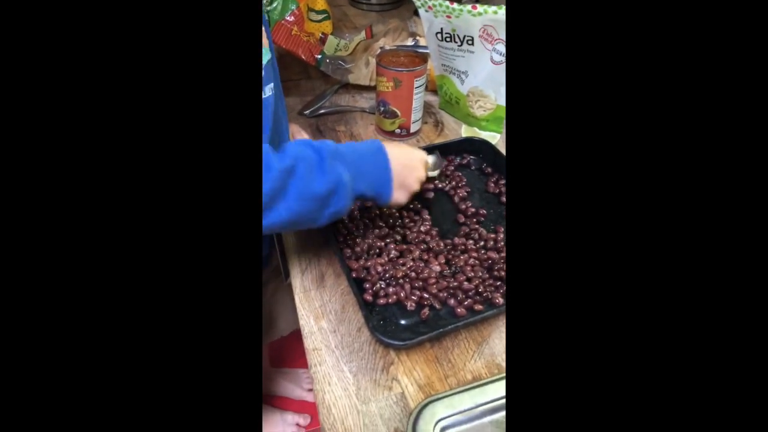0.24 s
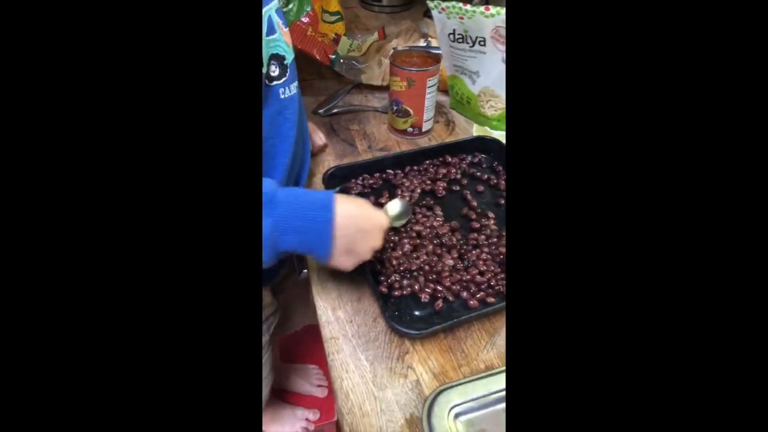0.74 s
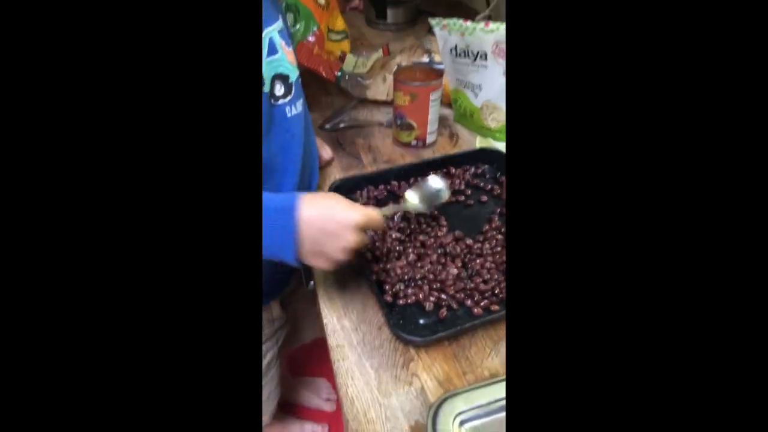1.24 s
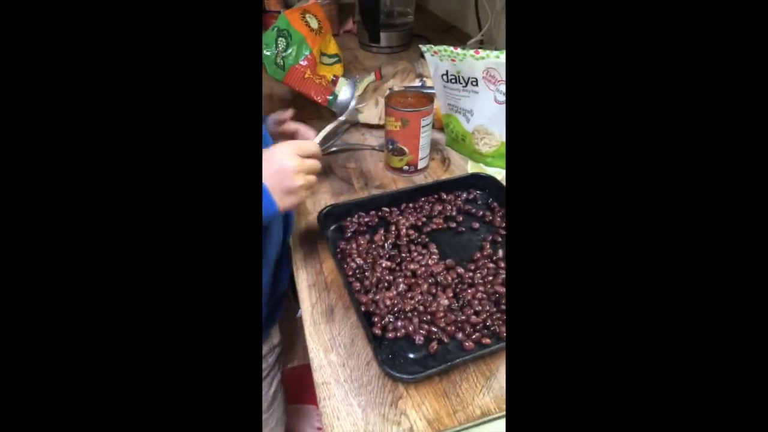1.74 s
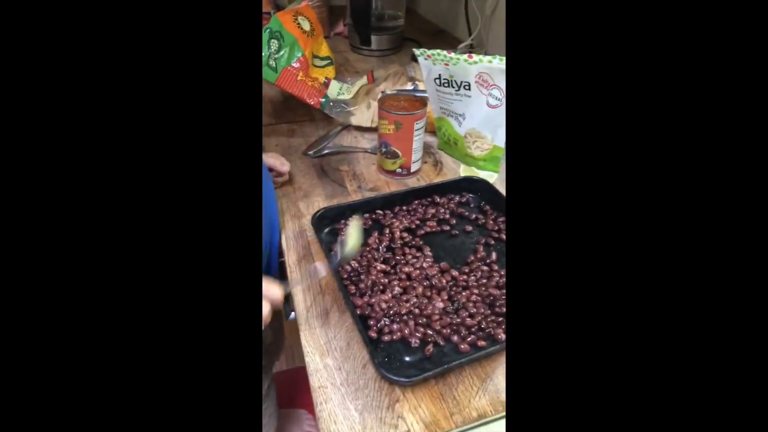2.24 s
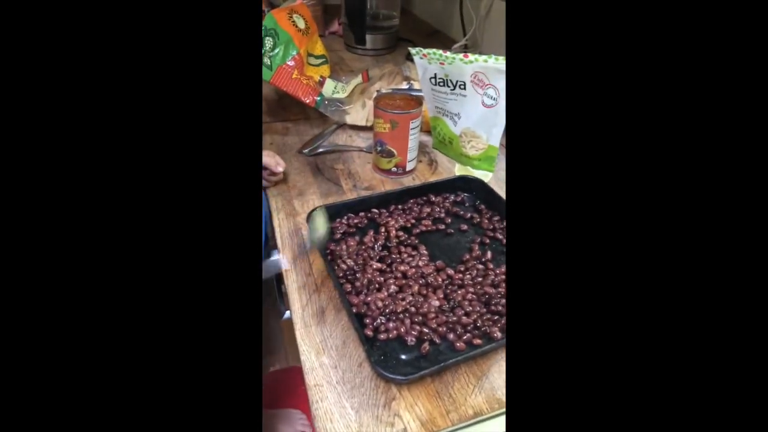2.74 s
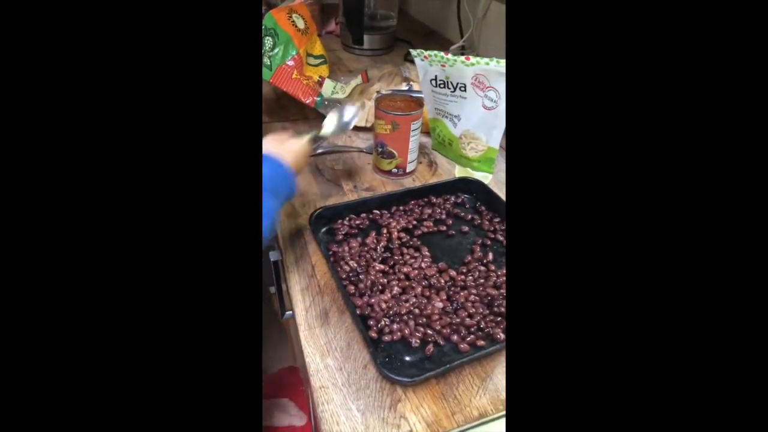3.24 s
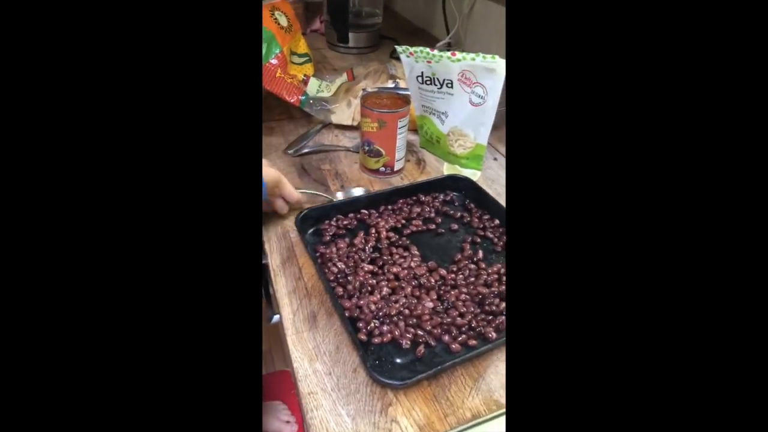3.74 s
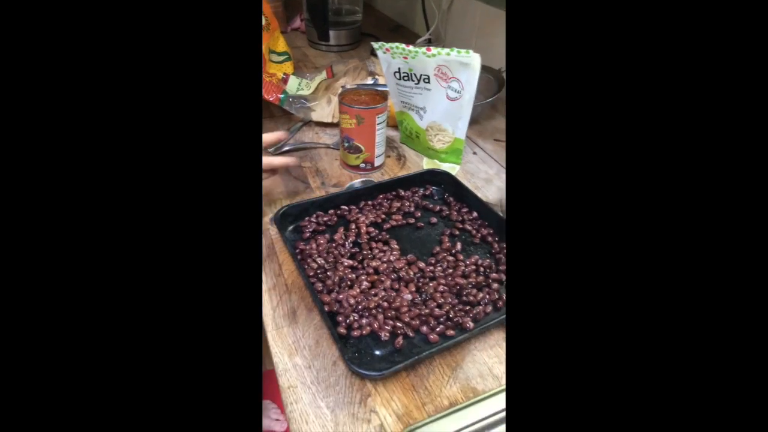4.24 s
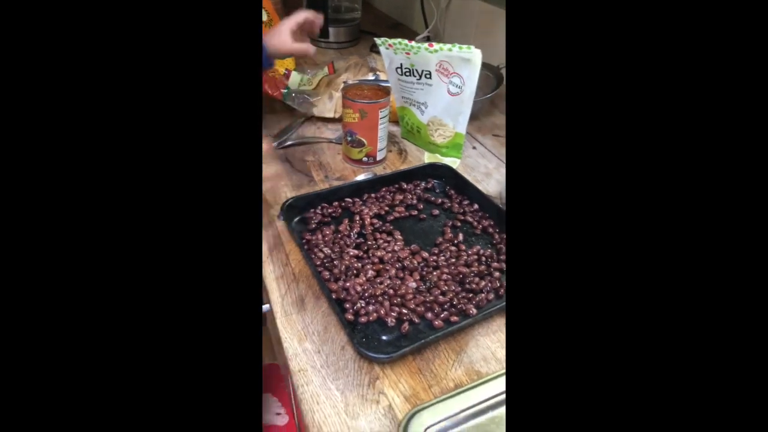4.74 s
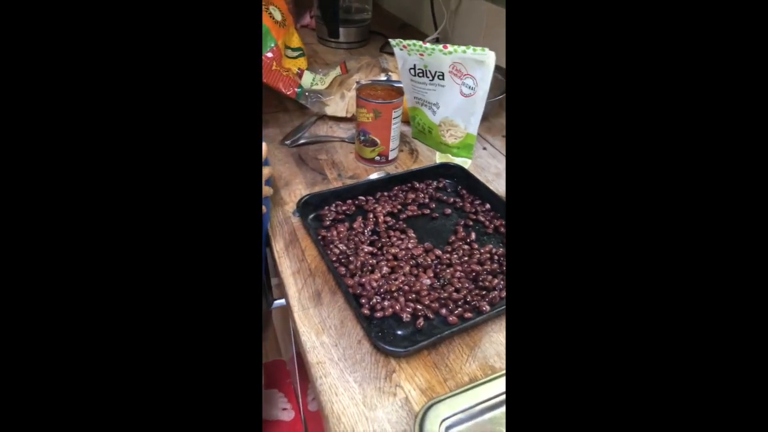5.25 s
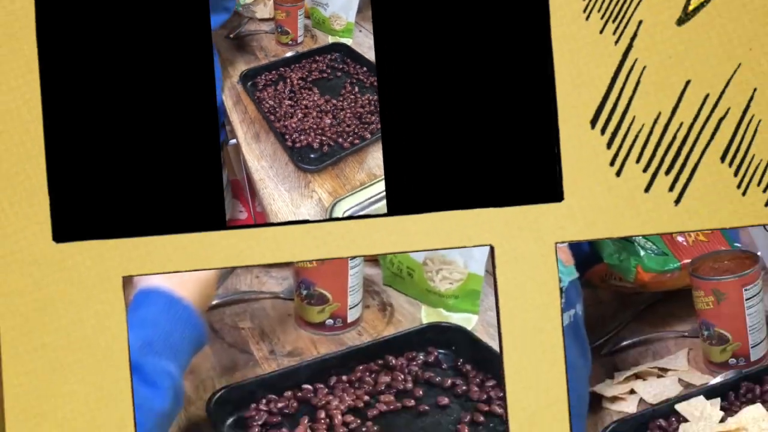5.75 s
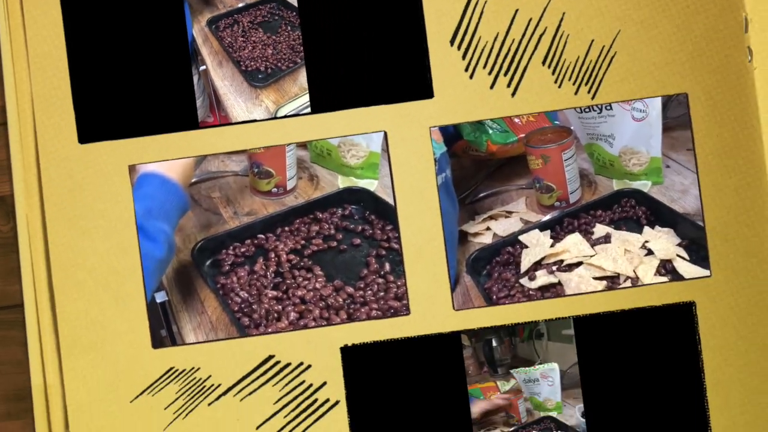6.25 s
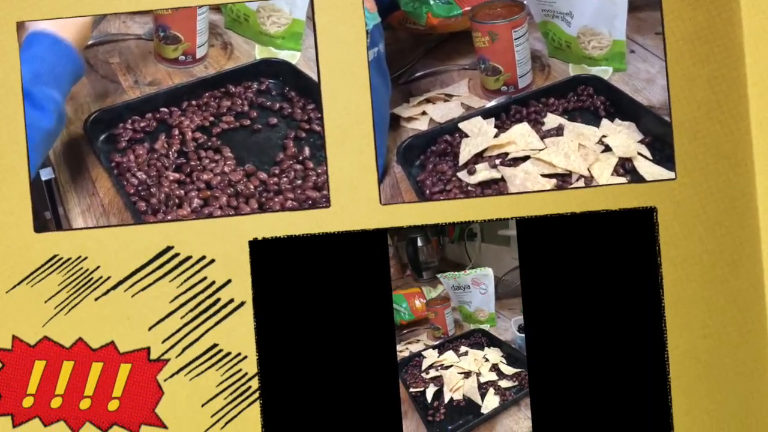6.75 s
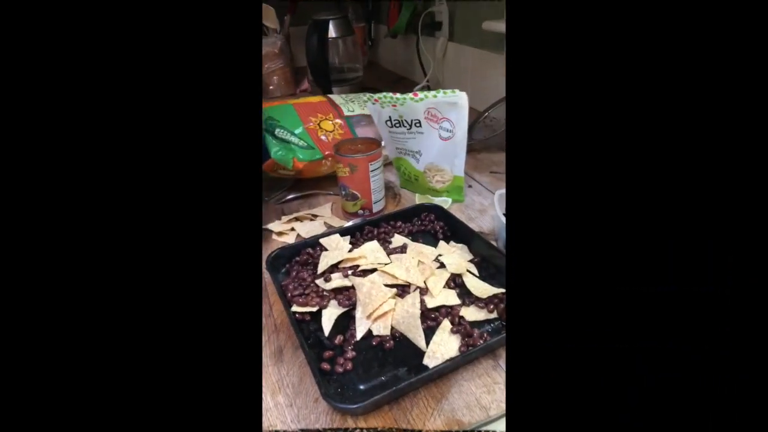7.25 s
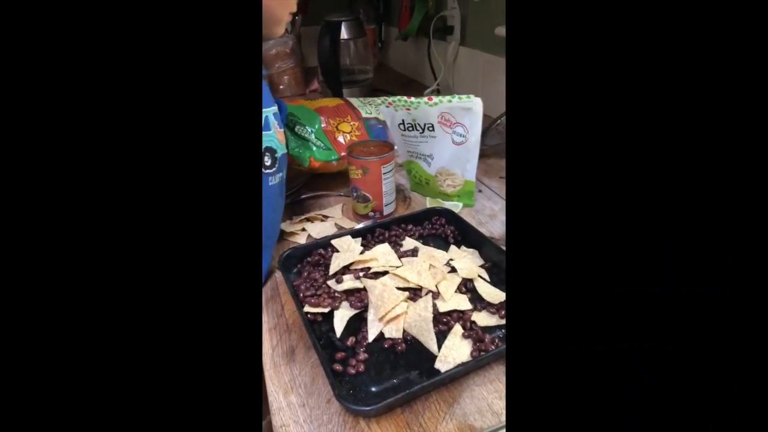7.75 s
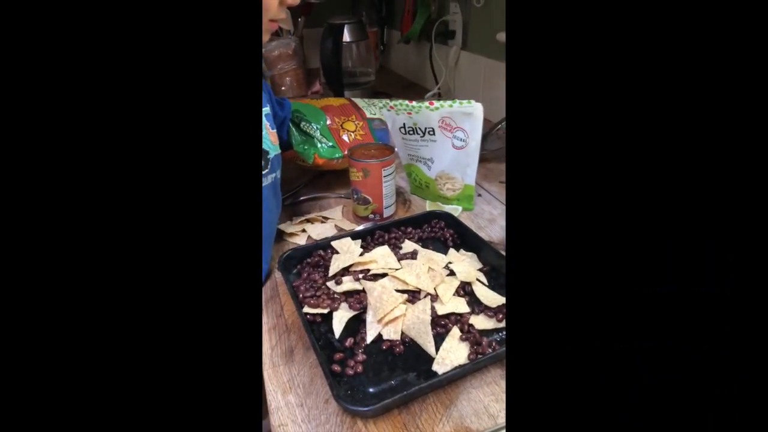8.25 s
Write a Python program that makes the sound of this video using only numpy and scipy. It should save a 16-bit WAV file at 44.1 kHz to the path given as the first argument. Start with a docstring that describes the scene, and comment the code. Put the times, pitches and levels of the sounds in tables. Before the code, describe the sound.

For the first two seconds a steel spoon pushes beans over a metal baking tray, making a faint rustle with soft, dull bumps. At about 2.5 and 2.7 seconds the spoon knocks sharply on the tray's rim, the loudest hits. A light brush and soft bumps follow, then another tap at 3.7 seconds. Between 4.3 and 4.6 seconds the spoon drops onto a wooden counter and bounces, with a brief, high steel ring. After a short lull, a hand starts crumpling a plastic chip bag at about 5.5 seconds. The crinkling is light at first, dotted with bright snaps, then grows denser and louder from 7 seconds and continues to the end, at around 8.7 seconds. Everything sounds close, with a short kitchen echo, over a faint, steady low hum and hiss.

```python
"""First comes a faint rustle with soft bumps: a steel spoon pushes beans over a baking tray.
The spoon knocks on the tray's rim, then drops and bounces on the counter, its steel ringing.
After that a hand crumples a plastic chip bag, whose creases give way in crackles and sharp snaps.
The kitchen echoes every blow, over a low steady hum and hiss."""
import sys
import numpy as np
from scipy import signal
from scipy.fft import rfft, irfft, next_fast_len
from scipy.io import wavfile
from scipy.ndimage import uniform_filter1d, map_coordinates

SR = 44100
rng = np.random.default_rng(int(sys.argv[2]) if len(sys.argv) > 2 else 0)


def master(y):
    """Save y as 16-bit WAV."""
    cut = np.clip(np.atleast_2d(y).T, -1, 1)
    pcm = np.round(cut * 32767)  # scale
    wavfile.write(sys.argv[1], SR, pcm.astype(np.int16))


N = 375291

# A hit has a low thud, a middle click and a high crack; t60 is the time to fade by 60 dB.
# In a row, the dB columns after "level" are added to that level.
# Spoon blows: t/s, level/dB, thud/dB, crack/dB, base rattle t60/s, contact/ms,
# counter/dB, rim/dB, spoon bowl/dB, spoon handle/dB
SPOON_BLOWS = [(2.52, -9.5, -10.5, 0.5, 0.033, 0.0012, -29.5, -8.5, -83, -80),
               (2.7282, -8.5, -18, 2, 0.055, 0.0034, -26.5, -8.5, -36, -82),
               (3.6687, -12.5, -14, -22, 0.031, 0.08, -25.5, -20.5, -42.5, -29),
               (4.275, -15.5, -8, -16, 0.076, 0.076, -21.5, -77.5, -12, -38),
               (4.370, -15, -19.5, -3.5, 0.032, 0.0093, -23.5, -14.5, -61, -23),
               (4.5043, -20.5, -17.5, 2, 0.021, 0.044, -30, -19.5, -59, -68),
               (4.5599, -28.5, -17, -6, 0.016, 0.03, -27.5, -22, -51, -52)]
# Tones of the free spoon: f/Hz, hit on the bowl/dB, hit on the handle/dB, t60/s
SPOON_TONES = [(3290, -9, -20.5, 0.54), (3590, -31.5, -3, 0.29), (4830, -4, -3, .5), (5485, -16, -26, .45),
               (7120, -7, -30.5, 0.6), (7800, -42, 1, 0.35), (9200, -4, -19, 0.16), (12650, -28, -23, .3),
               (13570, -33.5, -22.5, .2), (13880, -34.5, -33.5, .4), (15500, -36, -26.5, .25)]
# Tones of the tray's rim: f/Hz, gain/dB, t60/s
RIM_TONES = [(1470, -7.5, 0.05), (2022, -6.5, 0.22), (2450, 8, 0.0094), (2863, 0, .035), (4830, -3.5, .03),
             (6600, 6, 0.016), (7940, 0, 0.039), (9100, -1, 0.025), (10100, 7, 0.01), (11170, -4, 0.04),
             (15200, -5.5, .01)]
# Tones of the wooden counter: f/Hz, gain/dB, t60/s
COUNTER_TONES = [(126, -5.5, 0.097), (175, -2.5, .1), (300, -4.5, 0.1), (490, 0, 0.056), (710, 2.5, 0.05),
                 (990, 5.5, .04)]
# How hard the hand crumples the bag: t/s, level/dB, low crackle/dB
SQUEEZES = [(5.43, -66, -3), (5.47, -54, -4), (5.54, -62, 2), (5.72, -54.5, -4.5), (5.79, -46, 1),
            (5.9, -49.5, -2.5), (6.1, -50, -3.5), (6.3, -52, -7), (6.55, -52, -5.5), (6.621, -44, -1.5),
            (6.7, -52, -1), (6.81, -45, 1), (6.86, -43, 1), (7.0, -37.5, -1), (7.055, -49, 5),
            (7.1, -39, -2), (7.26, -41.5, 3), (7.45, -40, -3), (7.55, -45.5, 0), (7.609, -40, 0.5),
            (7.86, -40, 0), (7.95, -49.5, -0.5), (8.07, -44, 7), (8.15, -46, 2.5), (8.261, -38, -4),
            (8.33, -44, -3.5), (8.41, -38, -3), (8.51, -46, 2.5)]
# The bag's loudest snaps: t/s, level/dB, thud/dB, crack/dB
BAG_SNAPS = [(5.586, -45, -5, 0), (5.640, -46, -11, 7.5), (5.75, -24, -15.5, 5), (5.863, -25, -19, 0),
             (5.905, -32, -16, -6), (5.944, -28, -17, 10), (6.044, -31, -11, -8), (6.104, -44, -7, -12),
             (6.135, -21.5, -16, 4.5), (6.18, -32.5, -17, -7), (6.221, -26, -27, 1.5),
             (6.258, -32, -14, -8), (6.282, -31.5, -24, 2), (6.336, -29, -9.5, 4), (6.379, -38, -27, 11),
             (6.464, -33.5, -36, 13), (6.599, -32, -13.5, 6), (6.719, -43, -26, 6),
             (6.785, -29.5, -20, -13), (6.833, -24, -15, 3.5), (6.882, -23, -24, -2),
             (6.93, -24.5, -17, -4), (6.987, -17.5, -12.5, 4.5), (7.077, -13.5, -8, -2),
             (7.125, -25, -9, 16.5), (7.144, -20.5, -3, -16), (7.200, -18, -9.5, -2), (7.220, -25, -12, 3),
             (7.292, -23, 0, 6.5), (7.339, -26, -9, -15), (7.363, -24, -13, -1), (7.391, -33, -14, -10),
             (7.420, -19, -4.5, 3.5), (7.474, -28.5, -19, -12), (7.509, -22.5, -18, 3),
             (7.567, -27.5, -5, 11), (7.595, -24, 2.5, -3), (7.669, -35, -4, -6), (7.711, -13, -17, 0.5),
             (7.759, -16, -11, 1.5), (7.835, -28, -3, 4), (8.073, -35, 4, -12), (8.178, -34, 2, -7),
             (8.194, -30, 2, 2), (8.227, -30, -15, -6), (8.246, -31, -3, 10), (8.275, -27, 0, 2),
             (8.362, -31, -14, 4), (8.396, -32, -20, 6), (8.412, -26, -10, -6)]
# Tone colour of the snaps: f/Hz, gain/dB
SNAP_SPECTRUM = [(3000, -1.5), (7000, 3.5), (10000, 3.5), (15000, -7)]
# Tone colour of the crackle: f/Hz, gain/dB
CRACKLE_SPECTRUM = [(24, -47), (40, -29), (134, -8.5), (386, -6.5), (485, 2), (639, -4.5), (690, 4),
                    (744, -1.5), (1090, 2), (2090, 2), (8360, -5), (14900, -20), (16500, -25)]
# Bumps of spoon, beans and hands: t/s, level/dB, thud/dB, knock f/Hz, knock/dB
SOFT_BUMPS = [(0.0718, -49, -10, 1400, 15), (0.1341, -64, 15, 720, 13.5), (0.3076, -46.5, -22, 1420, 18.5),
              (0.3474, -52, -20, 333, 3), (0.429, -50.5, 3, 1320, 18), (0.4903, -57, 9, 1020, 4),
              (0.5114, -64, 13.5, 716, 10.5), (0.5442, -62.5, 5.5, 544, 13), (0.7932, -58.5, 7, 670, 8),
              (0.9118, -63, 3, 205, -4), (1.0933, -61.5, 11.5, 610, -2), (1.8063, -48.5, 1, 320, -1),
              (2.1676, -63.5, 3.5, 200, 11), (2.387, -60, -9, 258, -4), (3.158, -61, 8, 301, 1),
              (3.2828, -50.5, 1, 327, 3), (4.118, -63, 2.5, 654, 0.5), (4.8649, -59.5, 10, 146, -6.5),
              (5.79, -61.5, 4, 113, 12.5)]
# Brushes of beans and sleeve: loudest from t/s, hold/s, hiss/dB, dull rub/dB
BRUSH_STROKES = [(0.0, 0.048, -65, -59.5), (0.314, 0.029, -80.5, -61), (0.463, 0.039, -75, -63),
                 (1.077, .01, -78, -72), (1.62, 0.015, -77.5, -84), (1.84, .01, -80.5, -76),
                 (2.184, 0.011, -80, -80.5), (3.18, 0.093, -73, -72), (4.868, 0.011, -94, -93)]
# Tone colour of their hiss: f/Hz, gain/dB
BRUSH_SPECTRUM = [(590, -27), (1000, -8), (1720, -2.5), (3270, -6), (14800, -14.5), (15900, -38.5),
                  (16500, -53.5)]
# How long the room echoes: f/Hz, t60/s
ECHO_TIMES = [(100, .25), (500, 0.56), (1500, .42), (4000, 0.4), (9000, 0.34), (16000, 0.19)]
# Tone colour of the background: f/Hz, gain/dB
HUM_SPECTRUM = [(12, -31), (20, -11), (86, 5), (169, -8.5), (244, -3.5), (372, -8), (492, -14),
                (634, -18.5), (690, -18.5), (994, -20.5), (1470, -33.5), (2580, -34), (3520, -32.5),
                (12100, -40.5), (16500, -54.5)]


def spoon(bounce_s=0.15, held_share=0.7):
    """Each blow clicks and sets counter, rim and spoon ringing; the next blow stops the spoon's ring."""
    out, t = np.zeros(N + SR), np.arange(SR // 2) / SR
    rows = np.array(SPOON_BLOWS)
    hz, on_bowl, on_handle, t60 = np.transpose(SPOON_TONES)
    gaps = np.append(np.diff(rows[:, 0]), 1)
    for (s, db, *_, counter_db, rim_db, bowl_db, handle_db), gap in zip(rows, gaps):
        chatter = 0.6 + 0.9 * np.tanh(wobble(900, len(t)))  # the loose rim buzzes
        struck = amp(counter_db) * ring(COUNTER_TONES, t) + amp(rim_db) * ring(RIM_TONES, t) * chatter
        struck *= fade_in(t, 0.00066)
        tone_db = 20 * np.log10(amp(bowl_db + on_bowl) + amp(handle_db + on_handle))
        share = 1 if gap < bounce_s else held_share  # a held or lying spoon rings less long
        steel = ring(zip(hz, tone_db, t60 * share), t)
        steel *= amp(1.5 * wobble(35, len(t)))  # the spoon rocks
        steel *= fade_in(t, 0.0024) * amp(-60 * np.clip(t - gap, 0, None) / 0.02)
        out[round(s * SR):][:len(t)] += amp(db) * (struck + steel)
    return out[:N] + sum(bursts(rows, rows[:, 4:5], strike=1.3, contact_ms=rows[:, 5:6]))


def bag_snaps():
    """The plastic lets go in single loud, bright snaps."""
    return coloured(sum(bursts(BAG_SNAPS, t60=0.021, strike=3.3)), SNAP_SPECTRUM)


def bag_crackle(count=2200, swell_db=6, settle_s=0.087, memory_s=0.34):
    """Creases give way at random, few large and many small; the hand sets how loud they are."""
    t = np.arange(N) / SR
    times, levels, lows = np.transpose(SQUEEZES)
    start, end = times[0], times[-1]
    held = slice(round(start * SR), N)
    when, size, thud, crack, life = rng.random((count, 5)).T
    size_db = -3.5 * np.log(size + 0.062)
    creases = np.transpose([start + when * (end - start), size_db, 12 * thud, 12 * crack])
    crackle = bursts(creases, t60=0.0033 + 0.024 * life[:, None], strike=2.98, size=768)
    # A snap sets off small creases: the crackle swells, then settles.
    snap_times = np.append(0, np.array(BAG_SNAPS)[:, 0])
    since_snap = t - snap_times[np.searchsorted(snap_times, t, "right") - 1]
    clumps = amp(5 * np.tanh(wobble(32)) + swell_db * amp(-60 * since_snap / settle_s))
    mid_db = np.interp(t, times, levels, left=-150)
    low_db = np.interp(t, times, levels + lows, left=-150)
    recent_db = uniform_filter1d(np.clip(mid_db, -65, 0), round(memory_s * SR))
    high_db = mid_db - 4 + 0.7 * (mid_db - recent_db)  # brighter when louder than the nearby average
    tiny_creases = three_bands(*rng.standard_normal((3, N)))
    out = np.zeros(N)
    for clicks, tiny, db in zip(crackle, tiny_creases, (low_db, mid_db, high_db)):
        band = clumps * (unit(clicks, held) + 0.48 * unit(tiny))
        out += amp(db) * unit(coloured(band, CRACKLE_SPECTRUM), held)
    rumble = passband(rng.standard_normal(N), [60, 220])  # the whole bag shifts air
    return out + amp(low_db - 16.5) * clumps * unit(rumble)


def bumps(crack_db=-9):
    """Soft touches give a puff and a short knock, whose pitch depends on the spot touched."""
    out, t = np.zeros(N + SR), np.arange(SR // 10) / SR
    for s, db, thud_db, hz, knock_db in SOFT_BUMPS:
        level_db = db + max(thud_db, 0) + knock_db
        out[round(s * SR):][:len(t)] += ring([(hz, level_db, 12 / hz)], t) * fade_in(t, 0.00027)
    puffs = [(*row[:3], crack_db) for row in SOFT_BUMPS]
    return out[:N] + sum(bursts(puffs, t60=0.03, strike=1.6))


def stirring(rise_db_per_s=131.5, fall_db_per_s=119.5, tray_hz=670, width_hz=45):
    """Beans and cloth give a faint hiss and a dull rub; each brush rises, holds and falls."""
    t = np.arange(N) / SR
    s, hold, hiss_db, rub_db = np.transpose(BRUSH_STROKES)[:, :, None]
    shape_db = -rise_db_per_s * np.clip(s - t, 0, None) - fall_db_per_s * np.clip(t - s - hold, 0, None)
    hiss_gain = amp(-80.5) + amp((hiss_db + shape_db).max(0))  # never quite silent between brushes
    rub_gain = amp(-79.5) + amp((rub_db + shape_db).max(0))
    hiss = coloured(rng.standard_normal(N), BRUSH_SPECTRUM)
    rub = passband(rng.standard_normal(N), [250, 1200])
    tray_hum = lambda hz: 1j * hz * width_hz / (tray_hz ** 2 - hz ** 2 + 1j * hz * width_hz)
    rub = filtered(rub, lambda hz: 1 + amp(8.6) * tray_hum(hz))  # the loaded tray hums along
    uneven = amp(1.4 * wobble(40))
    return uneven * (hiss_gain * unit(hiss) + rub_gain * unit(rub))


def kitchen_echo(x, block=SR // 4, delay_samples=200):
    """Each pitch dies away at its own speed; every block of sound gets a fresh random echo."""
    out = np.zeros(N + SR)
    for at in range(0, N, block):
        hz, t, noise = signal.stft(rng.standard_normal(SR // 2), SR, nperseg=256)
        fade = amp(-60 * t / along(ECHO_TIMES, hz)[:, None])
        tail = signal.istft(noise * fade, SR, nperseg=256)[1]
        echo = signal.fftconvolve(x[at:at + block], tail / np.linalg.norm(tail))
        out[at + delay_samples:][:len(echo)] += echo
    return out[:N]


def hum(level_db=-67):
    """Appliances hum and the microphone hisses, barely changing."""
    noise = coloured(rng.standard_normal(N), HUM_SPECTRUM)
    return amp(level_db + 0.4 * wobble(1)) * unit(noise)


def bursts(rows, t60, strike, contact_ms=0, size=3072):
    """Each hit is a sharp pulse and a dying rattle; gives three tracks: thud, click and crack."""
    s, db, thud_db, crack_db = np.transpose(rows)[:4, :, None]
    t = np.arange(size) / SR
    noise = rng.standard_normal((len(s), size))
    noise[:, :16] = 0
    noise[:, 16] = strike  # the opening pulse
    khz = np.fft.rfftfreq(size, 1000 / SR)
    dulling = 1 / (1 + 2j * np.pi * khz * contact_ms) ** 2  # a longer contact is duller
    dying = lambda stretch: irfft(rfft(noise * amp(-60 * t / (stretch * t60))) * dulling, size)
    bands = three_bands(dying(4.5), dying(0.92), dying(0.37))  # low sound lingers
    fade_out = np.clip((t[-1] - t) / t[size // 8], 0, 1)
    at = (np.round(s * SR).astype(int) + np.arange(size)).ravel()
    tracks = []
    for hits, peak_db in zip(bands, (db + thud_db, db, db + crack_db)):
        hits = hits * fade_out
        hits *= amp(peak_db) / np.abs(hits).max(1, keepdims=True)
        tracks.append(np.bincount(at, hits.ravel(), N + size)[:N])
    return tracks


def ring(tones, t):
    """A struck thing's fading tones, each with a slightly random strength and a random phase."""
    return sum(amp(db + rng.normal(0, 1.5) - 60 * t / t60) * np.sin(2 * np.pi * (hz * t + rng.random()))
               for hz, db, t60 in tones)


def fade_in(t, rise_s):
    """A smooth rise from 0 towards 1."""
    return 1 - np.exp(-t / rise_s)


def amp(db):
    """Turns decibels into a gain."""
    return 10 ** (np.asarray(db) / 20)


def unit(x, where=slice(None)):
    """Scales x to an average strength (rms) of 1 over the given part."""
    return x / np.sqrt(np.mean(x[where] ** 2) + 1e-20)


def along(points, hz):
    """Reads between the rows of a (f/Hz, value) table on a log frequency axis."""
    f, value = np.transpose(points)
    return np.interp(np.log(hz + 1), np.log(f + 1), value)


def wobble(rate, size=N):
    """A smooth curve through `rate` random points a second."""
    points = rng.standard_normal(int(size * rate / SR) + 4)
    return map_coordinates(points, [np.arange(size) * rate / SR])


def filtered(x, response):
    """Scales each frequency in x by response(hz)."""
    size = next_fast_len(N + SR // 2)
    return irfft(rfft(x, size) * response(np.fft.rfftfreq(size, 1 / SR)), size)[..., :N]


def coloured(x, spectrum):
    """Gives x the tone colour of a (f/Hz, gain/dB) table."""
    return filtered(x, lambda hz: amp(along(spectrum, hz)))


def passband(x, hz, kind="band", order=2):
    """Keeps what lies between two frequencies, or above one if kind is "high"."""
    return signal.sosfilt(signal.butter(order, hz, kind, fs=SR, output="sos"), x)


def three_bands(low, mid, high):
    """Keeps each signal to its own range: thud, click, crack."""
    return passband(low, [180, 1200]), passband(mid, [1200, 6000]), passband(high, 6000, "high")


def scene():
    """Spoon, bumps and bag with their echo, over the stirring and the hum."""
    steel, soft, bag = spoon(), bumps(), bag_crackle() + bag_snaps()
    echo = kitchen_echo(amp(-8) * steel + amp(-12) * soft + amp(-10) * bag)
    return (steel + soft + bag + echo + stirring() + hum())[None]


def record(dry, bottom_hz=48, top_hz=16100):
    """Cuts away the deepest bass and the highest treble."""
    dry = passband(dry, bottom_hz, "high", order=3)
    return filtered(dry, lambda hz: amp(-np.clip(hz - top_hz, 0, None) / 12))


dry = scene()
out = record(dry)
master(out)
```